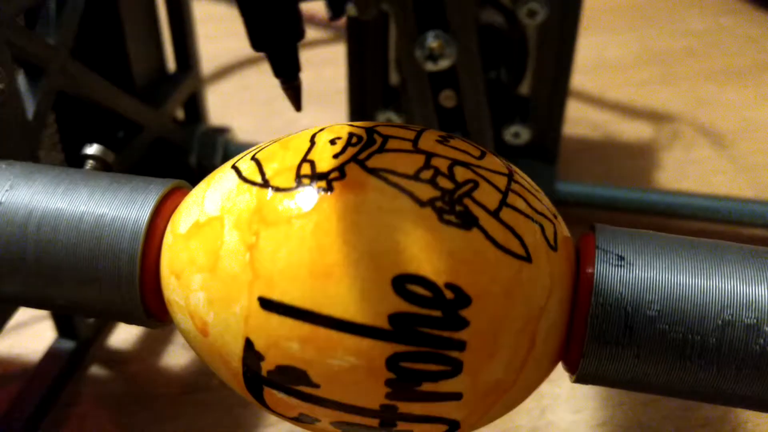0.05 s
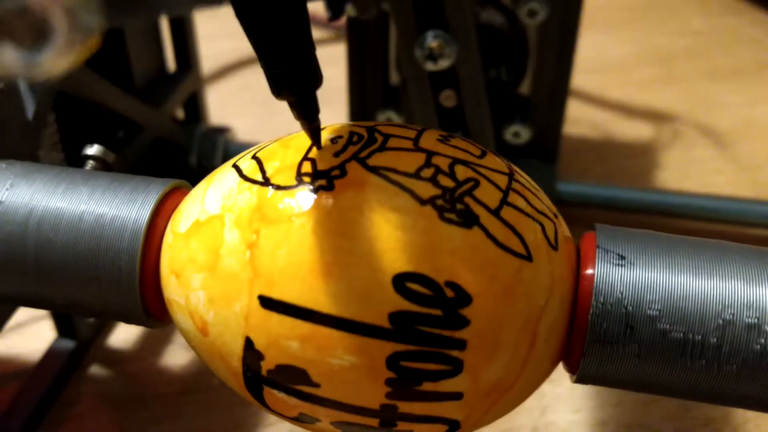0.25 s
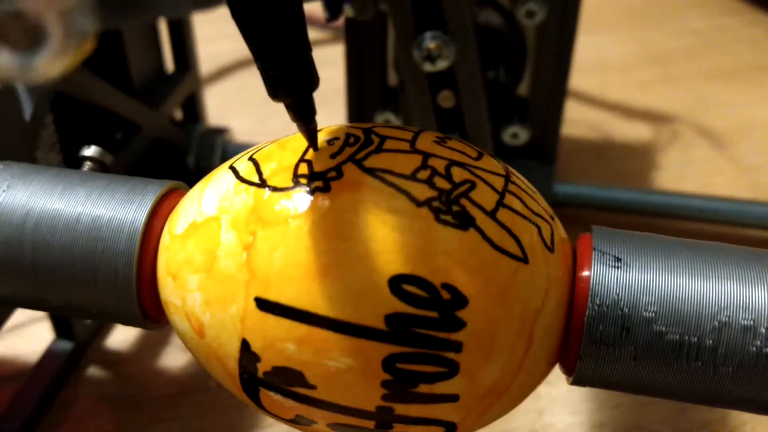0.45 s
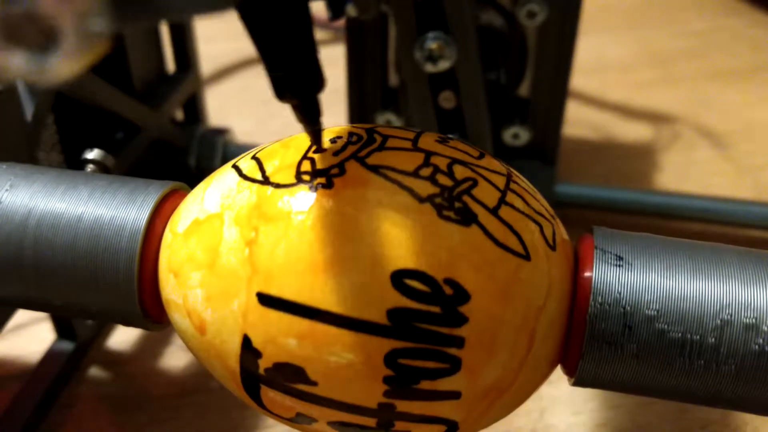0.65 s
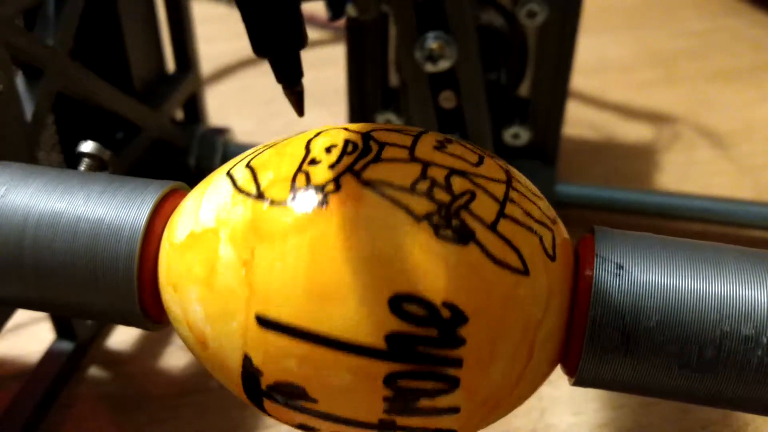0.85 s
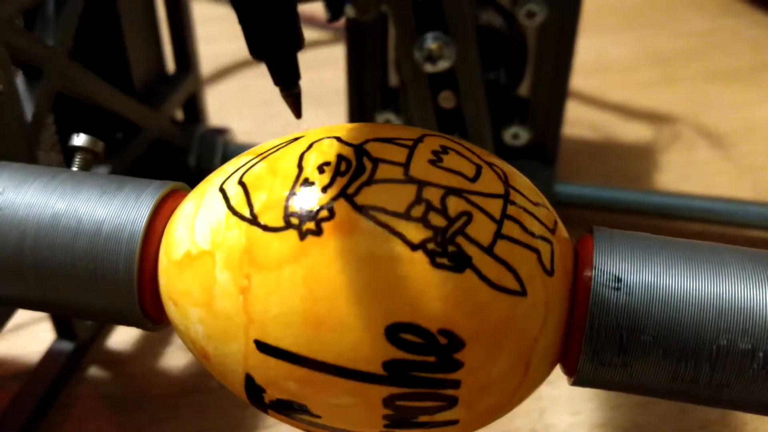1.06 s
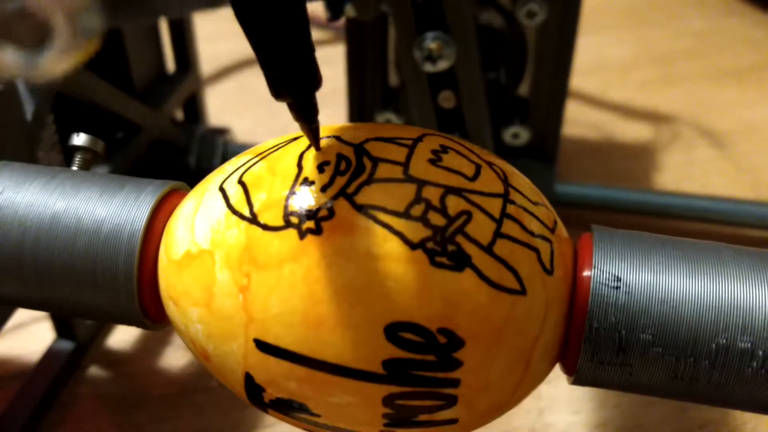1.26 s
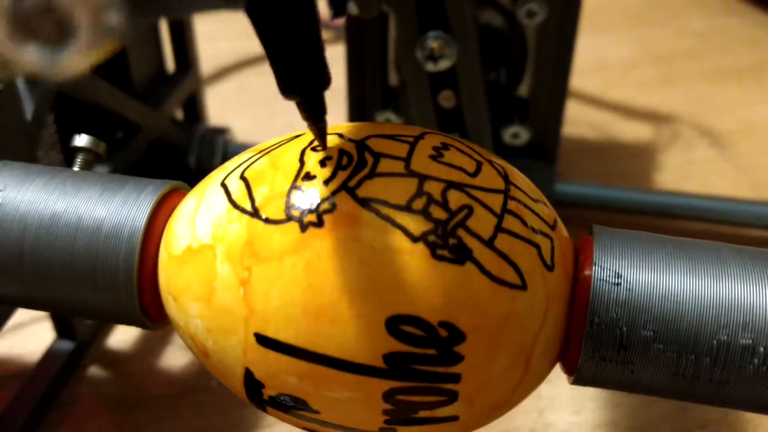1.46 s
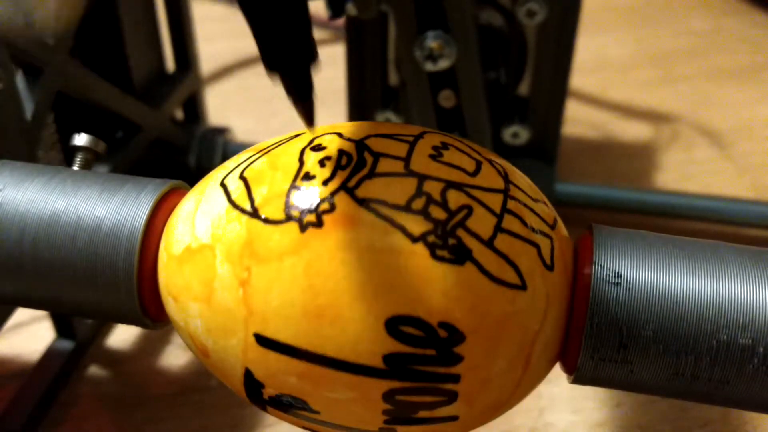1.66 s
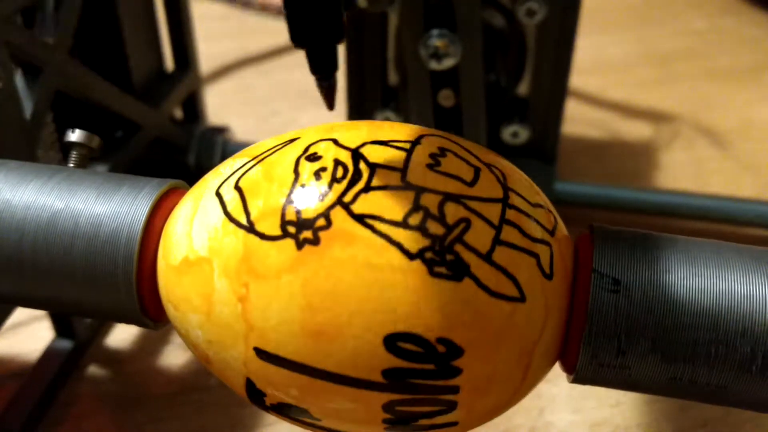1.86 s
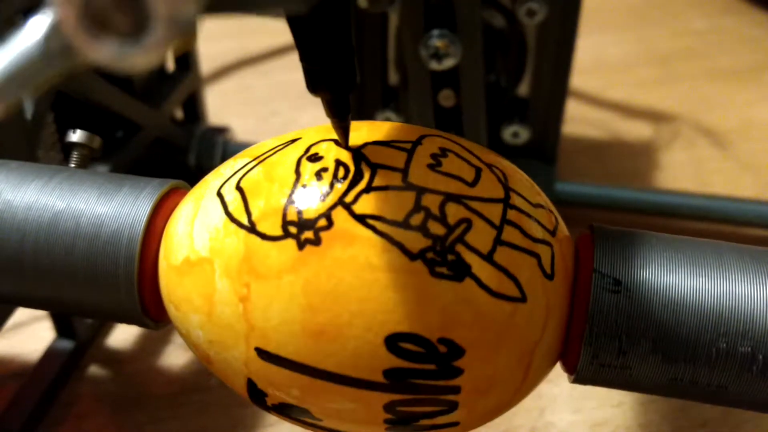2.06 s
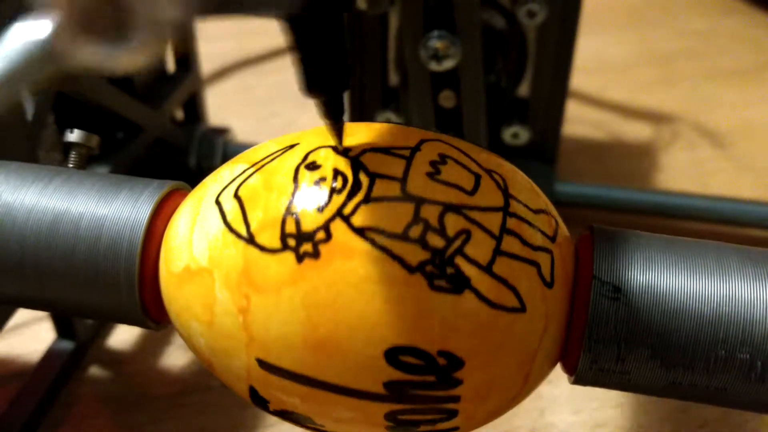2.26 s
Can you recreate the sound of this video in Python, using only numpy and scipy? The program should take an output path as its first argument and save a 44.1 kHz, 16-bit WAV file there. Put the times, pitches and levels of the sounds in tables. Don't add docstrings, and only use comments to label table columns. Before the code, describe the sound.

Close up in a quiet indoor room, an egg-drawing machine whines on one pitch while brief gear buzzes alternate: pen down with a clattering knock, pen up with a tick, repeated, ending on a flutter.

```python
import sys
import numpy as np
from scipy import signal
from scipy.fft import rfft, irfft, next_fast_len
from scipy.io import wavfile

SR = 44100
rng = np.random.default_rng(int(sys.argv[2]) if len(sys.argv) > 2 else 0)


def int16_out(signal):
    q = np.round(np.clip(np.atleast_2d(signal).T, -1, 1) * 32767)
    wavfile.write(sys.argv[1], SR, q.astype(np.int16))


def natural_amplitude(level_db):
    exponent = np.asarray(level_db, float) / 20
    return 10 ** exponent


N = 101430
T = np.arange(N) / SR

# frequency in Hz, level in dB per Hz.
HISS = [(1200, 7.5), (2500, 1.5), (4000, 2.5), (6500, -1), (9000, -5), (12000, -9.5), (14500, -4),
        (17000, -17)]
HISS_DB = -62.5

# frequency in Hz, level in dB per Hz.
RUMBLE = [(25, -8), (95, -26.5), (135, -6.5), (247, -2.5), (471, -13), (775, -12), (1190, -21.5),
          (1500, -19)]
# time in seconds, level in dB.
RUMBLE_LEVEL = [(0, 2), (.14, -1.5), (.35, 4.5), (.6, 3.5), (0.762, -4.5), (.9, -1), (1.3, 2.5),
                (1.55, 1.5), (1.7, -2), (2.0, 1), (2.2, -4.5), (2.3, -12.5)]
RUMBLE_DB, RUMBLE_PATCHY_DB = -56.5, 1.5

ROOM_T60_S, ROOM_DB, ROOM_TREBLE_DB, WALL_CUT_HZ = 0.19, -1.5, -6, 500
ROOM_ALIKE = 0.38
FRAME_ROOM_DB = -3.5

# time in seconds, peak level in dB.
WHINE = [(0, -49), (.15, -47), (.245, -44), (.275, -65), (.3, -45.5), (.5, -44.5), (.62, -41), (.72, -48.5),
         (.8, -46.5), (1.0, -45), (1.15, -44), (1.3, -43), (1.5, -43.5), (1.6, -46), (1.75, -48),
         (1.9, -44.5), (2.0, -63), (2.3, -47.5)]
# frequency in Hz, level in dB.
PARTNERS = [(796, -66.5), (4310, -69.5), (6265, -77.5)]
# start in seconds, stop in seconds, flutter in Hz, depth (0 to 1).
TURNS = [
    (0, 0.15, 21.9, 1),
    (0.49, 0.696, 22.7, 1),
    (0.768, 0.995, 49.5, 0.6),
    (1.381, 1.57, 26.7, 1),
    (1.68, 1.87, 28, 1),
    (2.15, 2.29, 24.4, 1),
]
WHINE_HZ = 1552
CARRIER_LEFT = 0.5

# servo start in seconds, pen landing in seconds, servo stop in seconds.
LOWERINGS = [
    (.156, .2455, .335),
    (1.039, 1.1275, 1.215),
    (1.877, 1.9655, 2.062),
]
# whirr in dB, thud in dB.
LOWERING_LEVELS = [(-39.5, -22), (-39.5, -23.5), (-46, -22)]
# servo start in seconds, servo stop in seconds, whirr in dB.
LIFTS = [
    (-.12, -0.046, -39),
    (0.639, 0.726, -37.5),
    (1.541, 1.627, -36),
]

# frequency in Hz, level in dB, time to fade 60 dB in seconds.
FRAME = [(173.5, -14, 0.047), (208, -2, 0.039), (286.3, -16, 0.16), (366, -3.5, 0.034), (404, -5, 0.029),
         (459, -0.5, 0.067), (521, -10.5, 0.076), (580, 1.5, 0.071), (625, 0, 0.053), (660, -5.5, 0.026),
         (874, -9.5, .03), (1910, 4, 0.0093), (1040, -7.5, 0.026), (1245, -7, 0.045)]
# frequency in Hz, level in dB, 60 dB fade in seconds.
TABLE_MODE = (126, -8, 0.63)
TABLE_DB = [2, 0.5, -3]
# delay in seconds, level in dB, brightness of the contact in Hz.
CONTACTS = [
    (.0008, -5, 380),
    (.0042, -3.5, 1100),
    (.0076, -8.5, 1100),
    (.0112, -7, 1200),
    (.0155, -4.5, 1500),
    (.0285, -19.5, 900),
    (.04, -12.5, 890),
]
REBOUND_DB = [-1.5, 0, -7]
# time in seconds, level in dB.
KNOCKS = [(.105, -76), (0.533, -43.5), (0.597, -46), (0.659, -45), (0.848, -50), (0.915, -53.5),
          (1.397, -49), (1.452, -46), (1.518, -54), (1.598, -50), (1.72, -46.5), (1.779, -47),
          (2.2811, -44.5)]
RATTLE_DB, RATTLE_RISE_S, RATTLE_HOLD_S, RATTLE_T60_S = -24, .001, .012, .04
FRAME_LOW_CUT_HZ = 112

# time in seconds, level in dB, 60 dB fade in seconds.
TICKS = [(0.185, -34, 0.016), (0.6311, -32.5, 0.0095), (0.635, -35, .015), (.651, -28, 0.023),
         (.656, -44, 0.013), (0.6724, -35.5, 0.016), (0.704, -53, 0.016), (0.718, -56, 0.016),
         (1.492, -48, 0.0084), (1.5141, -34.5, 0.007), (1.524, -48, .008), (1.5555, -50, 0.017),
         (1.885, -39.5, .03), (1.899, -34, 0.022), (2.2809, -38.5, 0.0062)]
# frequency in Hz, width in Hz, level in dB.
CASE = [(1118, 410, -6.5), (2100, 4300, -7.5), (3744, 195, -0.5), (4380, 1300, -0.5), (5880, 290, 0),
        (6643, 1000, 4.5), (7950, 480, 0), (8630, 840, 2.5)]
# frequency in Hz, width in Hz, level in dB.
CASE_TOP = [(11140, 2800, -11.5), (11110, 1180, -0.5), (12870, 1800, -7.5), (12500, 1700, -25),
            (14900, 510, -11.5)]
TEETH_PER_S, TEETH_SPREAD_DB, WHIRR_FLICKER_DB = 5700, -1, -1.5
BRIGHT_FOLLOWS, BRIGHT_LIFT_DB, BRIGHT_LOWER_DB = 1.98, 4.5, -1.5
ATTACK_S, RELEASE_S, RELEASE_DB, TAIL_S, TAIL_DB = .009, 0.038, -15, 0.069, -25
FREE_RUN_DB, START_SURGE_DB, SURGE_HOLD_S = -6.5, 3, 0.012
DIP_S, DIP_DB, APPROACH_S, APPROACH_DB = .006, -7, 0.035, 3
LANDING_SURGE_DB, AFTER_LANDING_DB = 1, 0.5
SURGE_S, MID_SAG_DB, END_SURGE_DB = .022, -1.5, 2
CRACK_DELAY_S, CRACK_SETTLE_S, CRACK_T60_S, CRACK_RISE_DB_PER_S = .014, .006, .02, 500
CRACK_DB, CRACK_TOP_DB = -7.5, -3.5
TICK_AIR_DB, TICK_AIR_HZ = -6, 4000

# frequency in Hz, lag in half turns.
PORT_PHASE = [(80, 1), (120, .1), (300, .15), (600, .2), (880, 0), (1300, .45), (1550, .88), (1680, .97),
              (1850, 1.04), (2205, 1.5), (9600, 9.9), (10150, 10), (10400, 9), (10900, 9), (11300, 8.6),
              (11550, 8.2), (12300, 8), (12650, 7.6), (13150, 7.5), (13350, 6.6), (14100, 6.6), (14300, 7),
              (14500, 6)]
LOW_CUT_HZ, CUTOFF_HZ = 40, 15800


def rms_one(x):
    return x / np.sqrt(np.mean(x ** 2) + 1e-20)


def follow(table):
    return np.interp(T, *np.transpose(table))


def cut(x, order, hz, kind="low"):
    return signal.sosfilt(signal.butter(order, hz, kind, fs=SR, output="sos"), x)


def drift(rate):
    r = np.exp(-20 * np.pi * rate / SR)
    noise = rng.standard_normal(N // 10 + 4002)
    slow = signal.lfilter([1], [1, -2 * r, r * r], noise)[4000:]
    return np.interp(np.arange(N) / 10, np.arange(len(slow)), rms_one(slow - slow.mean()))


def banded_noise(spectrum, patchy_db):
    hz, db = np.transpose(spectrum)
    out, white, shared = 0, rng.standard_normal((2, N)), drift(21.0)
    edges = np.geomspace(hz[0], hz[-1], int(3 * np.log2(hz[-1] / hz[0])))
    for k, (low, high) in enumerate(zip(edges, edges[1:])):
        band = cut(white[k % 2], 2, [low, high], "band")
        level = np.interp(np.log(low * high) / 2, np.log(hz), db)
        out = out + band * natural_amplitude(level + patchy_db * (0.11 * shared + drift(14.8)))
    return rms_one(out)


def hiss():
    return natural_amplitude(HISS_DB) * banded_noise(HISS, 0.39)


def rumble():
    return natural_amplitude(RUMBLE_DB + follow(RUMBLE_LEVEL)) * banded_noise(RUMBLE, RUMBLE_PATCHY_DB)


def room(x):
    t = np.arange(int(.4 * SR)) / SR
    tail = rng.standard_normal((2, len(t))) * natural_amplitude(-60 * t / ROOM_T60_S) * (t > .004)
    tail[1] = ROOM_ALIKE * tail[0] + np.sqrt(1 - ROOM_ALIKE ** 2) * tail[1]
    tail = tail / np.sqrt(np.sum(tail[0] ** 2))
    tail = cut(tail, 1, WALL_CUT_HZ) + natural_amplitude(ROOM_TREBLE_DB) * tail
    return natural_amplitude(ROOM_DB) * signal.fftconvolve(x[None], tail, axes=1)[:, :N]


def drivers():
    throb = 1
    for start, stop, hz, depth in TURNS:
        on = np.clip(np.minimum(T - start, stop - T) / 0.034, 0, 1)
        phase = 2 * np.pi * hz * (T - start) + 1.16 * drift(6.6)
        throb = throb + on * (CARRIER_LEFT - 1 + depth * np.sin(phase) + 0.11 * np.cos(2 * phase))
    out = natural_amplitude(follow(WHINE)) * throb * np.sin(2 * np.pi * WHINE_HZ * T + 0.66 * drift(8.4))
    for hz, db in PARTNERS:
        out = out + natural_amplitude(db + 2.5 * drift(6.)) * np.sin(2 * np.pi * hz * T + .8 * drift(12.))
    return out


def lowerings():
    return np.hstack([LOWERINGS, LOWERING_LEVELS])


def ring(clicks, hz, t60):
    r, w = natural_amplitude(-60 / (t60 * SR)), 2 * np.pi * hz / SR
    return signal.lfilter([0, np.sin(w)], [1, -2 * r * np.cos(w), r * r], clicks + 1e-18)


def landing_blows():
    blows, table = 0, None
    for k, (delay, db, hz) in enumerate(CONTACTS):
        clicks = np.zeros(N)
        for (_, land, _, _, thud_db), rebound_db in zip(lowerings(), REBOUND_DB):
            clicks[int((land + delay) * SR)] = -natural_amplitude(thud_db + db - 8 + rebound_db * (k > 1))
        blows = blows + cut(clicks + 1e-18, 2, hz)
        if k == 0:
            mode_hz, mode_db, mode_t60 = TABLE_MODE
            strength = natural_amplitude(np.interp(T, np.array(LOWERINGS)[:, 1], TABLE_DB))
            table = natural_amplitude(mode_db) * ring(blows * strength, mode_hz, mode_t60)
    return blows, table


def frame():
    blows, table = landing_blows()
    push, knocks = 0, np.zeros(N)
    for _, land, _, _, db in lowerings():
        fade = 60 * np.maximum(T - land - RATTLE_HOLD_S, 0) / RATTLE_T60_S
        push = push + np.clip((T - land) / RATTLE_RISE_S, 0, 1) * natural_amplitude(db + RATTLE_DB - fade)
    for s, db in KNOCKS:
        knocks[int(s * SR)] = natural_amplitude(db - 7.5)
    knocks = cut(knocks + 1e-18, 2, 900)
    rattle = push * (rng.random(N) < 4000 / SR) * rng.standard_normal((2, N))
    rings = 0
    for k, (hz, db, t60) in enumerate(FRAME):
        hit = rattle[k % 2] + blows + knocks * min(1, hz / 500)
        rings = rings + natural_amplitude(db) * ring(hit, hz, t60)
    return cut(rings + table, 5, FRAME_LOW_CUT_HZ, "high")


def resonate(x, table, flicker_db):
    out = 0
    for k, (hz, width, db) in enumerate(table):
        r = np.exp(-np.pi * width / SR)
        b = (1 - r * r) / 2 * np.array([1, 0, -1])
        a = [1, -2 * r * np.cos(2 * np.pi * hz / SR), r * r]
        rung = signal.lfilter(b, a, signal.lfilter(b, a, x))
        out = out + (-1) ** k * natural_amplitude(db + flicker_db * drift(23.4)) * rung
    return out


def effort(points):
    start, stop = points[0][0], points[-1][0]
    end = stop + RELEASE_S
    rows = [(start - ATTACK_S, -32)] + points
    rows += [(end, RELEASE_DB), (end + TAIL_S, TAIL_DB), (stop + .5, -70)]
    return np.interp(T, *np.transpose(rows), left=-90)


def servo_moves():
    moves = []
    for start, land, stop, db, _ in lowerings():
        surge_end, crack = start + SURGE_HOLD_S, land + CRACK_DELAY_S
        points = [(start + ATTACK_S, FREE_RUN_DB + START_SURGE_DB),
                  (surge_end, FREE_RUN_DB + START_SURGE_DB),
                  (surge_end + DIP_S, FREE_RUN_DB + DIP_DB),
                  (land - APPROACH_S, FREE_RUN_DB + APPROACH_DB),
                  (land, FREE_RUN_DB + 6.5),
                  (crack, LANDING_SURGE_DB),
                  (crack + CRACK_SETTLE_S, AFTER_LANDING_DB),
                  (stop, 0)]
        moves.append((effort(points), db, BRIGHT_LOWER_DB))
    for start, stop, db in LIFTS:
        points = [(start + ATTACK_S, 0), (start + SURGE_S, 0), ((start + stop) / 2, MID_SAG_DB),
                  (stop - SURGE_S / 2, END_SURGE_DB), (stop, 0)]
        moves.append((effort(points), db, BRIGHT_LIFT_DB))
    return moves


def servo():
    moves = servo_moves()
    hits = rng.random(N) < TEETH_PER_S / SR
    sizes = natural_amplitude(TEETH_SPREAD_DB * np.minimum(rng.exponential(1, N), 4))
    teeth = hits * sizes * rng.choice([-1, 1], N)
    teeth = rms_one(teeth) * natural_amplitude(WHIRR_FLICKER_DB * drift(130.0))
    low = sum(natural_amplitude(shape + db) for shape, db, _ in moves)
    top = sum(natural_amplitude(BRIGHT_FOLLOWS * shape + db + bright) for shape, db, bright in moves)
    ticks = 0
    for s, db, t60 in TICKS:
        ticks = ticks + (T >= s) * natural_amplitude(db - 60 * np.maximum(T - s, 0) / t60)
    snaps = natural_amplitude(TICK_AIR_DB) * cut(ticks * rng.standard_normal(N), 2, TICK_AIR_HZ, "high")
    for _, land, _, _, db in lowerings():
        late = T - land - CRACK_DELAY_S
        below_peak = np.maximum(-CRACK_RISE_DB_PER_S * late, 60 * late / CRACK_T60_S)
        ticks = ticks + (T >= land) * natural_amplitude(db + CRACK_DB - below_peak)
    ticks = ticks * rng.standard_normal(N)
    case = resonate(teeth * low + ticks, CASE, 2.3)
    case_top = resonate(teeth * top + natural_amplitude(CRACK_TOP_DB) * ticks, CASE_TOP, 5.2)
    return natural_amplitude(2) * (case + case_top) + snaps


def scene():
    body = frame() + rumble()
    air = servo() + hiss()
    return air + body + room(air + natural_amplitude(FRAME_ROOM_DB) * body) + drivers()


def low_pass(x):
    return signal.sosfilt(signal.butter(12, 16430, fs=SR, output="sos"), x)


def record(dry):
    size = next_fast_len(N + 4096)
    hz = np.arange(size // 2 + 1) * SR / size
    lag = np.pi * np.interp(hz, *np.transpose(PORT_PHASE))
    left = irfft(rfft(dry[0], size) * np.exp(-1j * lag), size)[:N]
    mix = cut(np.array([left, dry[1]]), 2, LOW_CUT_HZ, "high")
    mix = cut(mix, 10, CUTOFF_HZ)
    mix = signal.sosfilt(signal.cheby2(12, 70, CUTOFF_HZ + 700, fs=SR, output="sos"), mix)
    return low_pass(mix)


dry = scene()
out = record(dry)
int16_out(out)
```